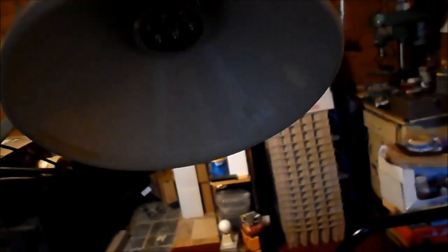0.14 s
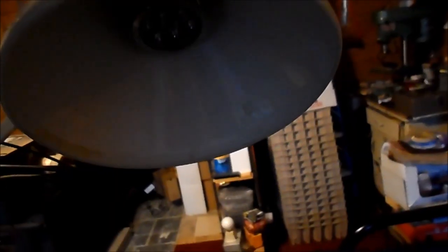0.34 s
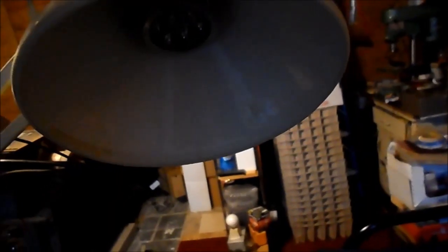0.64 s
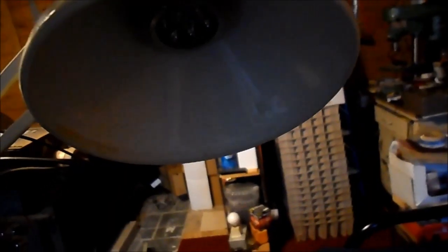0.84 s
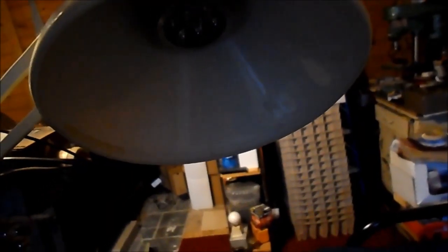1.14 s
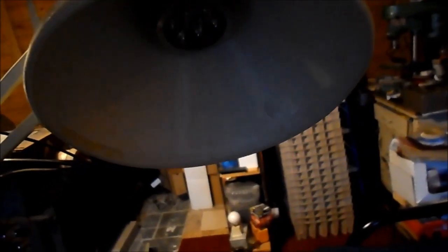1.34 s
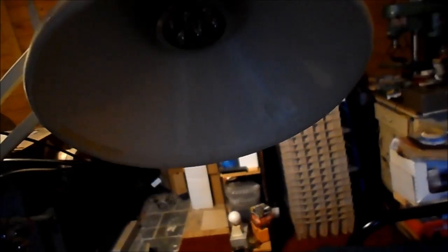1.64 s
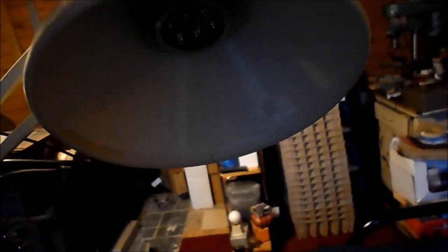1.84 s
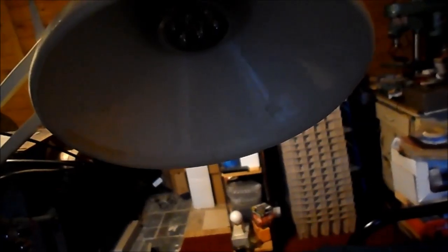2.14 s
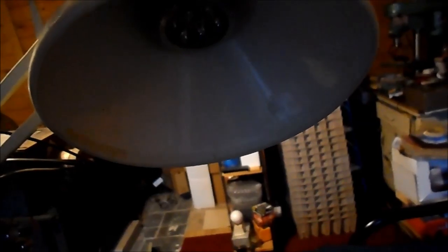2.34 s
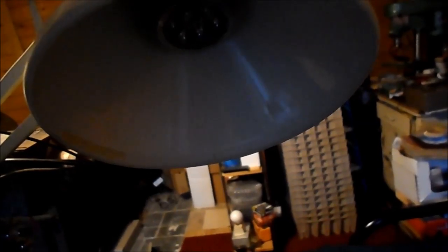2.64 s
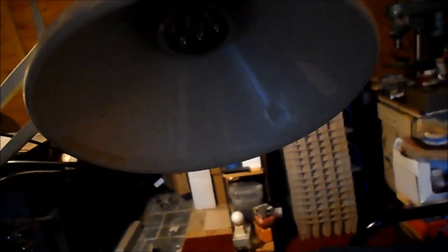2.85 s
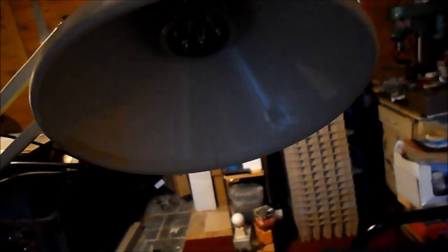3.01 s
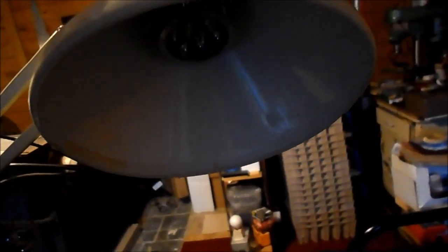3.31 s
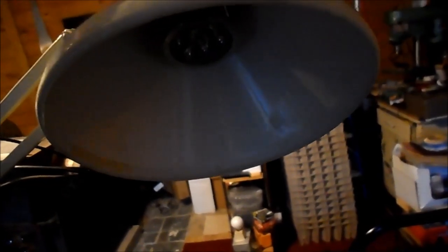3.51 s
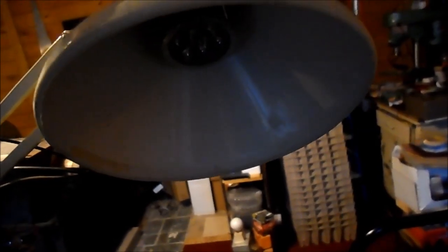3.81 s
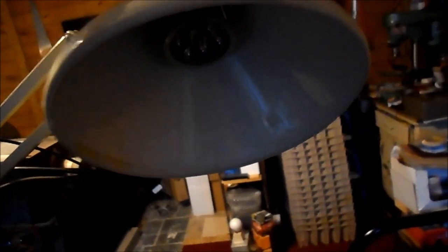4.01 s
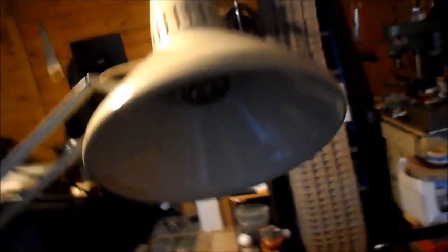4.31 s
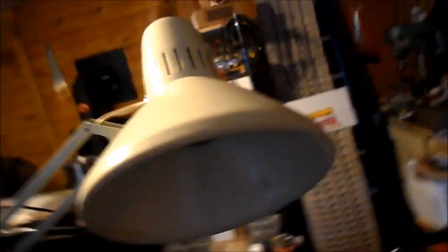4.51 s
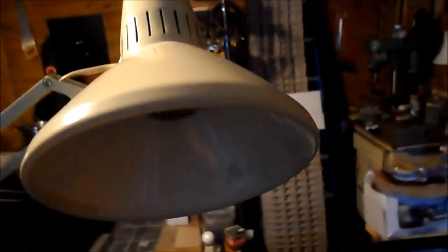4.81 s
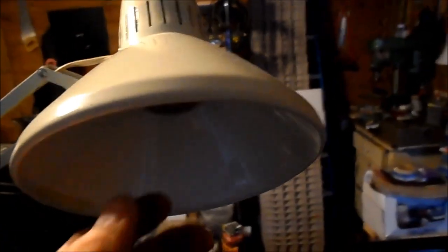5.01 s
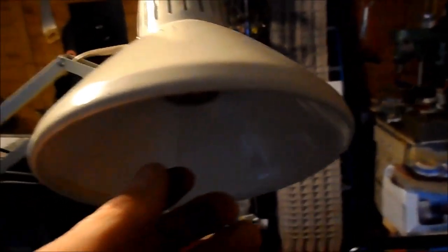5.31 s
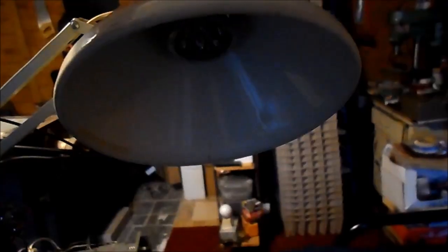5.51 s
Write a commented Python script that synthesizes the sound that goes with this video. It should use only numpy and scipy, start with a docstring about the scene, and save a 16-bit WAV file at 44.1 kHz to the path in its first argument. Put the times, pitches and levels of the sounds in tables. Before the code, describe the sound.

A lamp switch clacks hard twice, its metal shade ringing briefly, with ticking joints and hand brushes in a quiet humming workshop.

```python
"""A metal switch snaps loudly and joints tick: a desk lamp is turned, close to a hand-held camera.
Each blow is a burst of contact chatter and a short rattle, filtered by the housing, with a ringing
sheet-metal shade and room echoes. A hand brushes by as grainy swelling hiss and taps as short dry noise.
Behind lie coloured noise for rumble and microphone hiss, wavering hum partials and two whining tones that
beat. The camera turns its gain down after loud sound and rounds the peaks."""
import sys
import numpy as np
from scipy import signal
from scipy.fft import rfft, irfft
from scipy.io import wavfile
from scipy.ndimage import uniform_filter1d

SR = 44100
rng = np.random.default_rng(int(sys.argv[2]) if len(sys.argv) > 2 else 0)


def generate_wav(sig):
    """Save sig (samples, or channels by samples) to the path in sys.argv[1] as 16-bit PCM at SR."""
    pcm = np.round(np.clip(np.atleast_2d(sig).T, -1, 1) * 32767).astype(np.int16)
    wavfile.write(sys.argv[1], SR, pcm)


def ratio(d):
    """dB to gain"""
    e = np.asarray(d, float) / 20
    return 10 ** e


N = 249606  # length [samples]


def on_log_hz(hz, points):
    """Read a curve of (frequency, value) points on a log-frequency axis."""
    points = np.asarray(points)
    return np.interp(np.log(np.maximum(hz, 1)), np.log(points[:, 0]), points[:, 1])


def colour(x, points):
    """Filter by (frequency [Hz], level [dB]) points, leaving the phase alone."""
    gain = ratio(on_log_hz(np.fft.rfftfreq(len(x), 1 / SR), points))
    return irfft(rfft(x) * gain, len(x))


def causal(x, db):
    """Filter by a dB response without pre-ringing (minimum phase from the cepstrum)."""
    cepstrum = irfft(np.log(ratio(db)))
    cepstrum[1:len(db) - 1] *= 2
    cepstrum[len(db):] = 0
    return irfft(rfft(x, len(cepstrum)) * np.exp(rfft(cepstrum)))


def unit(x):
    """Scale to rms 1."""
    return x / np.sqrt(np.mean(x ** 2))


def walk(rate):
    """Smooth random wander of rms 1, from noise averaged twice over 1 / rate seconds."""
    k = int(SR / rate)
    once = uniform_filter1d(rng.standard_normal(N), k)
    return unit(uniform_filter1d(once, k))


def fade(t, t60):
    """Exponential decay, 60 dB down at t60."""
    return np.exp(-np.log(1000) * t / t60)


# the switch snapping over, one bounce included:
# (time [s], level [dB], body below 4 kHz [dB], 6 kHz clang [dB], edge above 11 kHz [dB])
SNAPS = [(1.4107, -6, 3.5, 2, -5.5), (1.421, -7.5, -2.5, -4.5, -4), (3.9891, -4, -1, -6, 3.5)]
# tone shared by all snaps: the knock, then the five regions (level [dB])
SNAP_TONE_DB = [-24.5, -19.5, -14, -3.5, -1, -15]


def snaps():
    """Switch parts slam together; each snap shifts the shared tone by its body, clang and edge."""
    blows = []
    for s, level_db, body, clang, edge in SNAPS:
        tone_db = np.add(SNAP_TONE_DB, [body, body, body, clang, 0, edge])
        blows.append((s, level_db, *tone_db))
    return blows


# joints ticking as the lamp is turned:
# (time [s], level [dB], knock [dB], lean from 2.2 towards 3.5 kHz [dB])
TICKS = [(0.7007, -48.5, -11, 8), (0.7727, -54.5, -11, -2), (3.2134, -62.5, 8.5, -0.5),
         (3.3295, -15, -27.5, -1.5), (3.3332, -22, -32, -1), (3.3393, -46, -29, 4),
         (3.4133, -56.5, -4, 1.5), (4.2093, -29.5, -39, 2), (4.2657, -26, -19, 3.5), (4.2723, -26, -45, -6),
         (4.3486, -49.5, 2.5, 8)]
# tone of a tick at full scale, one entry per region (level [dB])
TICK_TONE_DB = [-19, -24, -8.5, 0.5, -39]
# softer contact of weaker ticks, one entry per region (lift per dB of weakness [dB/dB])
DULLING = [0.51, 0.52, .25, 0, 0]


def ticks():
    """Joints slip; weaker ticks are softer contacts with relatively more low end."""
    blows = []
    for s, level_db, knock_db, lean in TICKS:
        regions_db = TICK_TONE_DB - level_db * np.array(DULLING) + [-lean, lean, 0, 0, 0]
        blows.append((s, level_db, knock_db, *regions_db))
    return blows


# the low end, to which each blow's knock level is added: (frequency [Hz], level [dB])
KNOCK = [(200, -26), (550, 1.5), (1200, 10.5)]
# centres of the five regions that shape a blow above the knock: (frequency [Hz])
REGIONS_HZ = [2200, 3500, 5900, 8800, 13500]


def blow_tone(knock_db, regions_db):
    """Spectrum points of the force of one blow: knock below, regions above."""
    knock = [(hz, db + knock_db) for hz, db in KNOCK]
    return knock + list(zip(REGIONS_HZ, regions_db))


# switch housing, resonances: (frequency [Hz], width [Hz], lift [dB])
HOUSING = [(770, 150, 10), (1090, 230, 3), (1400, 250, -7.5), (2230, 640, 15), (3349, 510, 13.5),
           (4070, 270, 4), (5110, 120, 8), (5800, 290, 6.5), (6520, 240, 10.5), (7200, 570, 4),
           (7800, 400, 0), (9240, 3000, 1.5), (12305, 190, 12.5), (14610, 1400, 17.5)]


def housing(hz):
    """Lift [dB] of the housing: the sum of its resonance humps."""
    return sum(db / (1 + (2 * (hz - centre) / width) ** 2) for centre, width, db in HOUSING)


# sheet-metal shade, thin rings: (frequency [Hz], relative level [dB], 60 dB decay time [s])
SHADE = [(2130, -10, 0.11), (2285, -7, 0.12), (2643, -12, 0.65), (2665, -14, 0.5), (3208, 0, .36),
         (3250, -3, 0.15), (3345, -2, .15), (3461, -10, 0.35), (4950, -2, .09), (5280, -2, .14),
         (5790, -4, 0.24), (5900, -4, 0.15), (6350, -5, 0.12), (6480, -5, 0.12), (7075, -6, .12),
         (8040, -5, .15)]


def shade(tone, seconds):
    """Struck modes ring on as decaying sines; each blow lands elsewhere, so their shares scatter."""
    hz, db, t60 = np.transpose(SHADE)[:, :, None]
    t = np.arange(round(seconds * SR)) / SR
    scatter_db = 1.5 * rng.standard_normal(hz.shape)
    gain = ratio(db + on_log_hz(hz, tone) + scatter_db) * rng.choice([-1, 1], hz.shape)
    return np.sum(gain * fade(t, t60) * np.sin(2 * np.pi * hz * t), axis=0)


# room decay: (frequency [Hz], 60 dB decay time [s])
ROOM_T60 = [(700, .25), (2500, .24), (6000, .24), (10000, .2), (15000, .155)]
ROOM_DB, ROOM_BUILD_S = -20, 0.0035


def room(size):
    """Dense echoes that build up quickly and lose their treble first: decaying half-octave noise bands."""
    t = np.arange(size) / SR
    out = 0
    for hz in 500 * 2 ** np.arange(0, 5.1, .5):
        edges = [hz / 2 ** .25, min(hz * 2 ** .25, 20000)]
        sos = signal.butter(2, edges, "band", fs=SR, output="sos")
        band = signal.sosfilt(sos, rng.standard_normal(size))
        out = out + band * fade(t, on_log_hz(hz, ROOM_T60))
    return ratio(ROOM_DB) * out * np.clip(t / ROOM_BUILD_S, 0, 1)


# tone of what outlasts the blow: (frequency [Hz], level [dB])
TAIL = [(600, -6), (1500, 4), (3000, -5.5), (6000, -3), (9000, -0.5), (11000, 1), (13000, 0), (15500, -1)]
CHATTER_SCALE_S, CRACK_DB = 0.00067, 19.5
RATTLE_DB, RATTLE_T60_S = -11.5, 0.096
SHADE_DB = -26.5
RING_PER_DB = 0.1056  # tails stand out more after weak blows [dB per dB of weakness]


def clicks():
    """Each blow: chatter, a short rattle and the room, all through the housing; the shade rings on."""
    size = 2 ** 14
    out = np.zeros(2 * N)
    t, hz = np.arange(size) / SR, np.fft.rfftfreq(2 * size, 1 / SR)
    rise = t / CHATTER_SCALE_S
    housing_db = housing(hz)
    for s, level_db, knock_db, *regions_db in sorted(snaps() + ticks()):
        ring_db = -RING_PER_DB * level_db
        tone = blow_tone(knock_db, regions_db)
        tone_db = on_log_hz(hz, tone)
        # parts slam: a quick rise, then dying contacts
        chatter = rng.standard_normal(size) * rise ** 2.15 * np.exp(-rise)
        chatter = ratio(CRACK_DB) * chatter / np.sqrt(np.sum(chatter ** 2))
        blow = causal(chatter, tone_db + housing_db)
        rattle = rng.standard_normal(size) * fade(t, RATTLE_T60_S) * np.clip(rise, 0, 1)
        tail = ratio(RATTLE_DB + ring_db) * rattle + ratio(ring_db) * room(size)
        # the tail comes from many parts, so the housing colours it less, and not at the top
        tail_db = tone_db + on_log_hz(hz, TAIL) + 0.87 * housing_db * (hz < 11000)
        struck = (blow + causal(tail, tail_db))[:size]
        rings = ratio(SHADE_DB + ring_db) * shade(tone, size / SR) * np.clip(rise / 2, 0, 1)
        i = int(s * SR)
        out[i:i + size] += ratio(level_db) * (struck + rings)
    return out[:N]


# fingers touching and leaving a surface near the camera:
# (time [s], level [dB], fleshiness [0 nail to 1 pad])
TAPS = [(4.8206, -35, 0.3), (4.877, -48, 0.05), (5.2093, -28, 0.86), (5.2171, -23, 0.66), (5.2243, -43, .9),
        (5.2627, -39.5, .3), (5.292, -47, 0.6), (5.396, -56, .1), (5.411, -47, .05)]
# fingernail contact: (frequency [Hz], level [dB])
NAIL_TONE = [(500, -35), (2500, -28), (5000, -9), (9500, 5), (11500, -9)]
# finger-pad contact: (frequency [Hz], level [dB])
PAD_TONE = [(500, -14.5), (2500, 10), (5000, -6), (9500, -8.5), (11500, -35)]
TAP_RISE_S, TAP_ROOM_DB = 0.00088, -7.5


def taps():
    """Each tap: a brief burst of contact noise, toned between nail and pad, and a little room."""
    size = 2 ** 13
    out = np.zeros(2 * N)
    rise, hz = np.arange(size) / SR / TAP_RISE_S, np.fft.rfftfreq(2 * size, 1 / SR)
    for s, level_db, flesh in TAPS:
        tone_db = (1 - flesh) * on_log_hz(hz, NAIL_TONE) + flesh * on_log_hz(hz, PAD_TONE)
        contact = rng.standard_normal(size) * rise * np.exp(1 - rise)
        tap = causal(contact + ratio(TAP_ROOM_DB) * room(size), tone_db)[:size]
        i = int(s * SR)
        out[i:i + size] += ratio(level_db) * tap
    return out[:N]


# a hand brushing past, timed at closest contact:
# (time [s], level [dB], approach [dB/s], retreat [dB/s])
BRUSHES = [(4.788, -50, 68, 104), (4.831, -47.5, 700, 148), (5.27, -52.5, 450, 350), (5.4, -65, 170, 175)]
# tone of skin and cloth: (frequency [Hz], relative density [dB per Hz])
BRUSH_COLOUR = [(40, 27), (100, 7.5), (250, 11), (500, 5.5), (1300, 0), (2200, 1), (4000, -8.5), (6000, -2),
                (9000, -0.5), (11000, -9.5), (14000, -34)]


def brush():
    """Skin and cloth sliding: grainy hiss that swells towards each contact and drops away."""
    grain = rng.standard_normal(N) * ratio(1.8 * walk(120))
    t = np.arange(N) / SR
    level = 0
    for s, db, approach, retreat in BRUSHES:
        level = level + ratio(db - np.maximum(approach * (s - t), retreat * (t - s)))
    return unit(colour(grain, BRUSH_COLOUR)) * level


WHINE_HZ, WHINE_DB, WHINE_SINKS_DB_PER_S = 1500, -71.5, 0.74  # level of the stronger tone at time 0
BEAT_HZ, BEAT_SHARE, BEAT_PEAK_S = 0.98, .55, 3.033


def whine():
    """A thin whine: two near tones that drift in and out of step, so they beat, slowly sinking."""
    t = np.arange(N) / SR
    beat = 1 + BEAT_SHARE * np.exp(-2j * np.pi * BEAT_HZ * (t - BEAT_PEAK_S))
    tones = np.real(beat * np.exp(2j * np.pi * WHINE_HZ * t))
    return np.sqrt(2) * ratio(WHINE_DB - WHINE_SINKS_DB_PER_S * t) * tones


# hum partials: (frequency [Hz], rms level before wavering [dB], waver rate [1/s], waver depth [0-1])
HUM = [(30.2, -62.5, 3.1, 0.01), (249.5, -63.5, 8, .25), (177, -79.5, 8.2, 0.6), (115, -82.5, 21, 0.8)]


def hum():
    """Low hum partials, each wavering in size and phase."""
    t = np.arange(N) / SR
    out = 0
    for hz, db, rate, depth in HUM:
        waver = 1 + depth * (walk(rate) + 1j * walk(rate))
        out = out + np.sqrt(2) * ratio(db) * np.real(waver * np.exp(2j * np.pi * hz * t))
    return out


# rumble and hiss: (frequency [Hz], relative density [dB per Hz])
FLOOR = [(11, -27.5), (18, 6.5), (43, -2), (151, -11.5), (200, -10), (251, -14), (297, -12), (430, -18.5),
         (1190, -18.5), (1370, -21.5), (1500, -21.5), (1980, -24), (8180, -28), (15700, -30.5)]
FLOOR_DB = -59.5  # level of the part above about 400 Hz


def rumble_and_hiss():
    """Room rumble and microphone hiss as one coloured noise whose level wanders slightly."""
    noise = colour(rng.standard_normal(N), FLOOR)
    low = signal.sosfilt(signal.butter(2, 400, fs=SR, output="sos"), noise)
    noise = noise / np.std(noise - low)
    return noise * ratio(FLOOR_DB + 0.24 * walk(16.0))


START_S, STOP_S = 0.446, 5.467


def scene():
    """All sources, between a hard start and a hard stop."""
    t = np.arange(N) / SR
    mix = clicks() + taps() + brush() + whine() + hum() + rumble_and_hiss()
    return (mix * ((t > START_S) & (t < STOP_S)))[None]


def top_cut(x):
    """Nothing passes above the cut-off."""
    return signal.sosfilt(signal.butter(12, 17070, fs=SR, output="sos"), x)


DUCK_DB_PER_ENERGY, RECOVER_S = 6501, 2.8  # energy: squared full scale times seconds
TOP_HZ = 15750


def record(dry):
    """Loud energy turns the camera's gain down and it creeps back; peaks are rounded, the top is cut."""
    energy = signal.lfilter([1 / SR], [1, -np.exp(-1 / (RECOVER_S * SR))], dry ** 2)
    ducked = dry * ratio(-DUCK_DB_PER_ENERGY * energy)
    rounded = np.tanh(.8 * ducked) / .8
    low_pass = signal.ellip(10, .2, 36, TOP_HZ, fs=SR, output="sos")
    finished = signal.sosfilt(low_pass, rounded)
    return top_cut(finished)


dry = scene()
out = record(dry)
generate_wav(out)
```